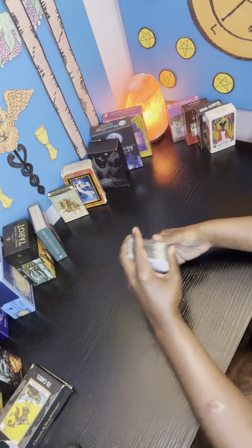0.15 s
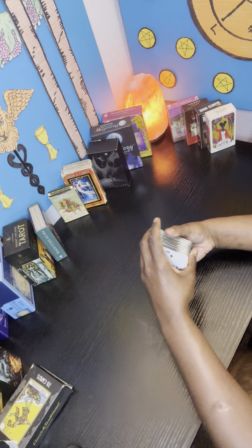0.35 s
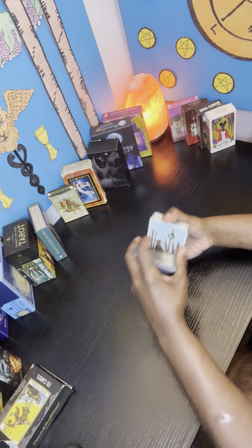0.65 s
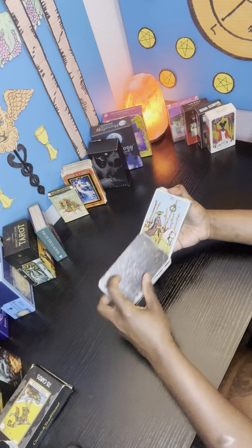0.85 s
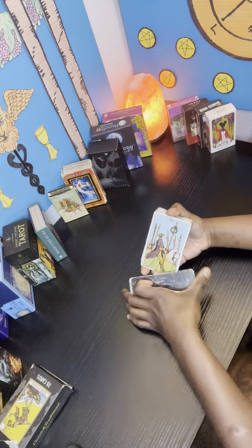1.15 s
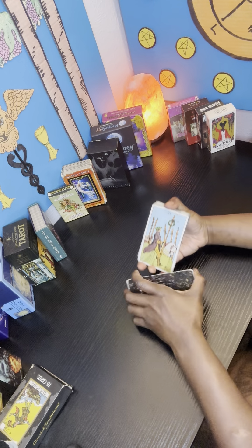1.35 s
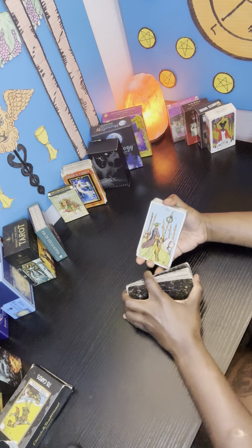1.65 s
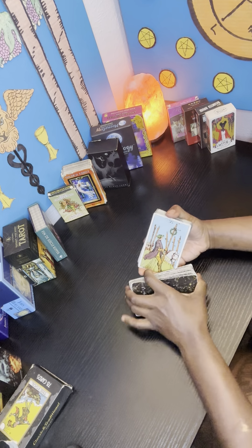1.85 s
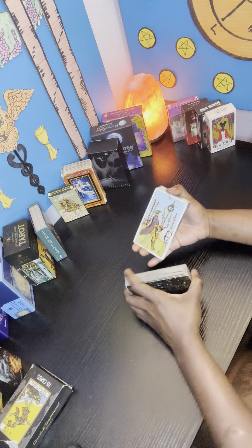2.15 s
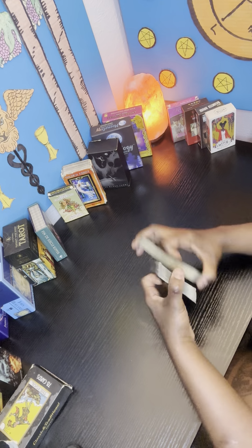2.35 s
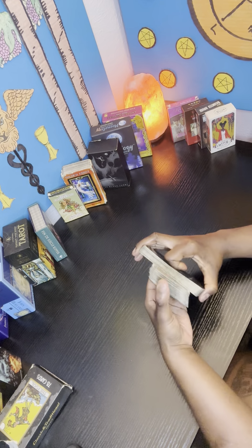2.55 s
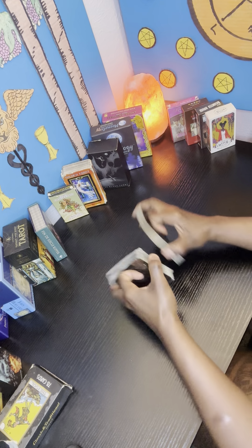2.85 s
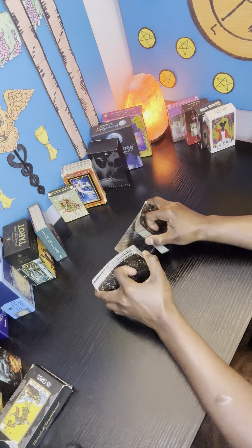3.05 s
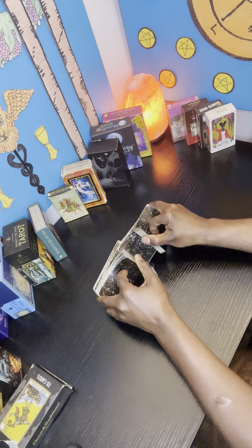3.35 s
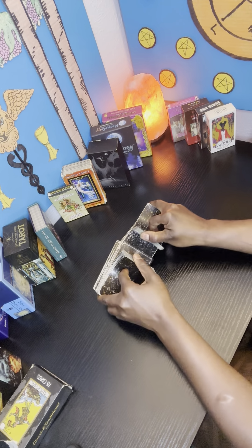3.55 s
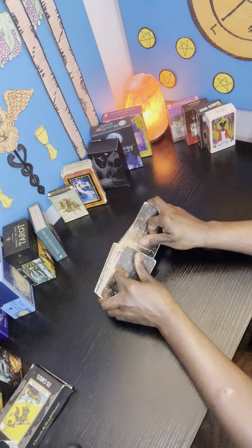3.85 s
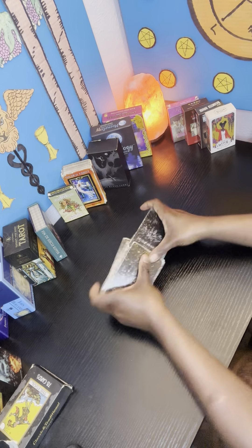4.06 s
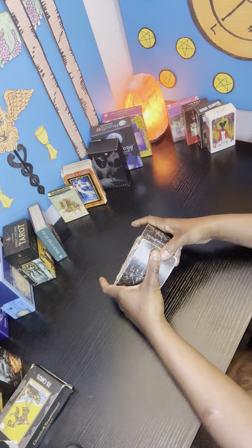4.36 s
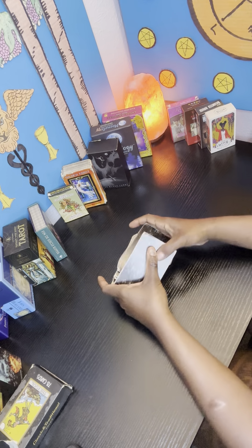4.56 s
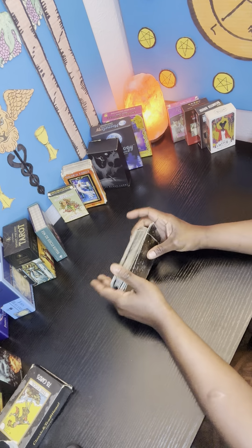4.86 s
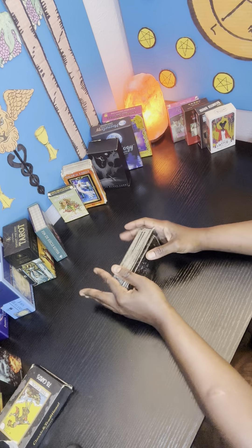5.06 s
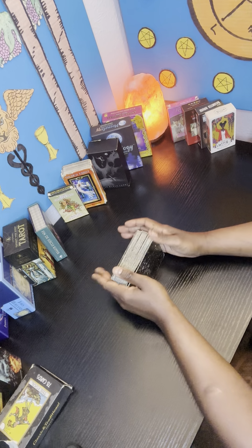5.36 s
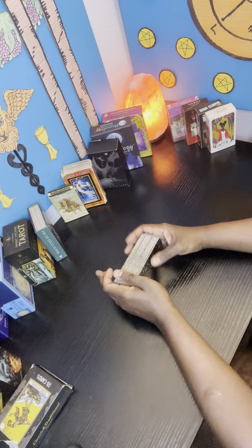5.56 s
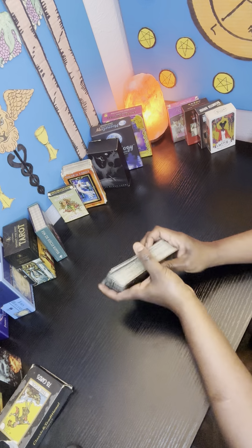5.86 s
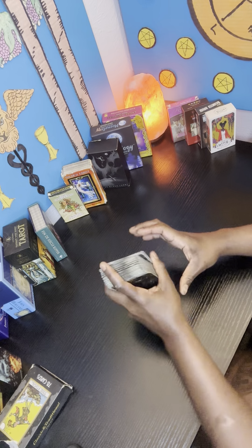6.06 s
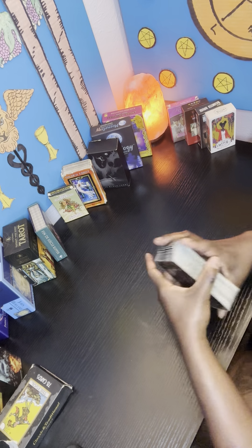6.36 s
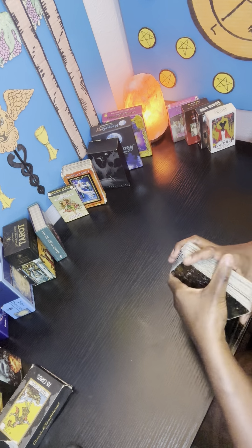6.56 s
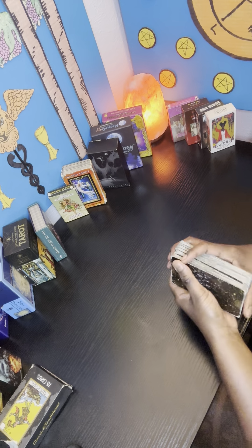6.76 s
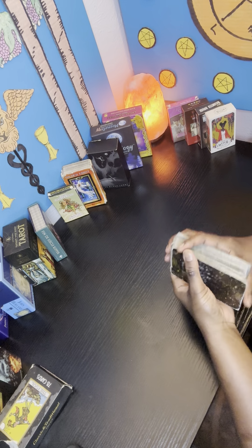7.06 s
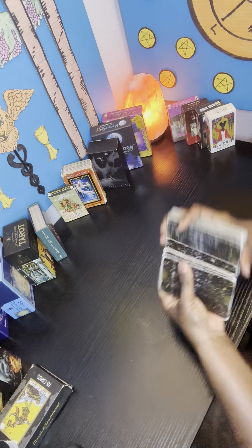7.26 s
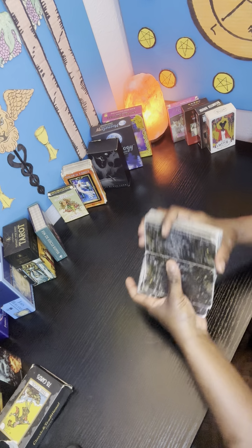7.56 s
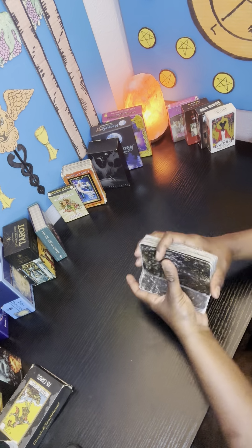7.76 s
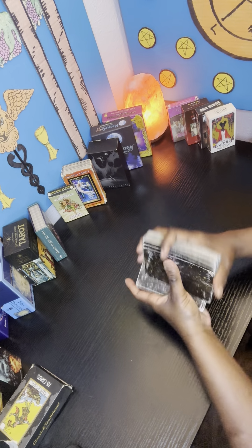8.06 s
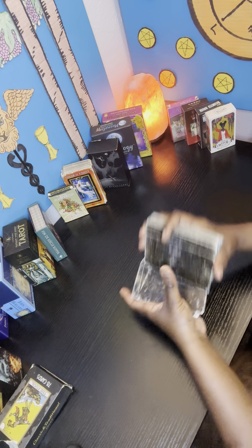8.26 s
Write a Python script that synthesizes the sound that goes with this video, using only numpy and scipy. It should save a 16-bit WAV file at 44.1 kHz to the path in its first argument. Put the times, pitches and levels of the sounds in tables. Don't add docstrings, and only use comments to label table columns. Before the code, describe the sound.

A small quiet room, close stereo microphone, a faint steady low rumble. At 0.0 s a crisp papery slap, then weak rustling and light touches until a cluster of soft, duller taps at about 1.4-1.7 s. A hard bright double snap hits at 2.03 s, followed by near quiet. From 2.7 to 3.05 s the bent pack gives tiny dry creaks, then a light tap. The riffle runs from 3.2 to 3.8 s: a dense, uneven, loud crackle of snapping cards with papery friction. Soft sliding follows, then from 4.25 to 4.65 s ragged scraping slaps as the halves are pushed together. Squaring taps come at 4.8-5.6 s, strongest near 4.9 and 5.1 s, then fade. A dull hollow table thump sounds at 6.15 s. After a lull, a low slap at 7.3 s leads into light intermittent brushes and slides to about 8.4 s.

```python
import sys
import numpy as np
from scipy import signal
from scipy.fft import rfft, irfft, next_fast_len
from scipy.io import wavfile
from scipy.ndimage import uniform_filter1d

SR = 44100
rng = np.random.default_rng(int(sys.argv[2]) if len(sys.argv) > 2 else 0)


def master_out(mix):
    frames = np.transpose(np.atleast_2d(mix))
    ceiling = np.clip(frames, -1, 1)
    pcm = np.round(ceiling * 32767).astype(np.int16)
    wavfile.write(sys.argv[1], SR, pcm)


def volts_from_decibels(level):
    exponent = np.asarray(level, float) / 20
    return 10 ** exponent


N = 370440


def rms_one(x):
    return x / np.sqrt(np.mean(x ** 2) + 1e-20)


def peak_one(x):
    return x / (np.max(np.abs(x)) + 1e-20)


def butter(x, order, hz, kind):
    return signal.sosfilt(signal.butter(order, hz, kind, fs=SR, output="sos"), x)


def at_hz(points, hz):
    points = np.array(points)
    log_hz = np.log(np.maximum(points[:, 0], 1))
    return np.interp(np.log(np.maximum(hz, 1)), log_hz, points[:, 1])


def coloured(x, spectrum):
    hz = np.fft.rfftfreq(x.shape[-1], 1 / SR)
    return irfft(rfft(x) * volts_from_decibels(at_hz(spectrum, hz)), x.shape[-1])


def drift(rate):
    r = np.exp(-2 * np.pi * rate / SR)
    wander = signal.lfilter([1], [1, -2 * r, r * r], rng.standard_normal(N + SR))
    return rms_one(wander[SR:])


def ring(clicks, modes):
    out = 0
    for hz, level_db, t60 in modes:
        r = volts_from_decibels(-60 / (t60 * SR))
        w = 2 * np.pi * hz / SR
        strike = [0, volts_from_decibels(level_db) * np.sin(w)]
        out = out + signal.lfilter(strike, [1, -2 * r * np.cos(w), r * r], clicks + 1e-18)
    return out


def add(track, s, sound):
    at = max(round(s * SR), 0)
    track[at:at + len(sound)] += sound[:len(track) - at]


def snaps(events, t60, rise_s, ragged_db, crack_db, hiss_db, quick, broad_db=-2.5):
    out = np.zeros(N)
    t = np.arange(SR // 5) / SR
    rise = 1 - np.exp(-(t / rise_s) ** 2)
    fall = volts_from_decibels(-60 * t / t60)
    noises = rng.standard_normal((len(events), 2, len(t)))
    for (s, peak_db, hz, thump_db, mid_db, top_db), (air, grit) in zip(events, noises):
        uneven = rms_one(uniform_filter1d(grit, size=60))
        puff = air * rise * fall * volts_from_decibels(ragged_db * uneven)
        body = butter(puff, 3, min(3.2 * hz, 3100), "low")
        pitched = butter(body, 1, [hz / 1.3, hz * 1.34], "band")
        broad = butter(body, 1, 400, "high")
        slap = peak_one(peak_one(pitched) + volts_from_decibels(broad_db) * peak_one(broad))
        flick = air * rise * fall ** (1 + quick) + .2 * puff
        crack = volts_from_decibels(mid_db + crack_db) * peak_one(butter(flick, 2, [2800, 5200], "band"))
        softened = signal.lfilter([.6], [1, -.4], flick)
        hiss = volts_from_decibels(top_db + hiss_db) * peak_one(butter(softened, 2, [4800, 15500], "band"))
        add(out, s, volts_from_decibels(peak_db) * (slap + crack + hiss))
    return out


def with_edges(events, edges):
    return [(*row, crack_db - row[1], hiss_db - row[1]) for row, (crack_db, hiss_db) in zip(events, edges)]


# frequency in Hz, density in dB per Hz.
RUMBLE = [(20, -35.5), (31, -21.5), (42, -3), (70, 2.5), (110, -12), (145, -4.5), (200, -18), (300, -28),
          (420, -33), (600, -52), (900, -71)]


def room_rumble():
    level_db = -52
    return volts_from_decibels(level_db) * rms_one(coloured(rng.standard_normal(N), RUMBLE))


# start in seconds, slap peak in dB, slap pitch in Hz,
# table thump in dB against the slap.
CUTS = [(0.001, -8.5, 2000, -11), (0.248, -49.5, 595, -8.5), (1.166, -34, 1620, -3.5),
        (1.385, -43.5, 1620, -7.5), (1.475, -26.5, 890, -15), (1.5, -22.5, 505, -16), (1.512, -21, 654, -6),
        (1.665, -29, 1320, -4.5), (2.034, -4, 2090, -20.5), (2.038, -8.5, 1270, -20),
        (2.047, -15.5, 1900, -6), (3.08, -25.5, 805, -7), (4.031, -38, 1310, -7), (4.093, -46, 600, 19),
        (4.831, -17.5, 594, -2), (4.889, -7.5, 1430, -21.5), (4.9, -16.5, 1670, -1.5),
        (4.992, -22, 1380, -18), (5.057, -23.5, 1310, -21), (5.082, -11.5, 2060, -16.5),
        (5.156, -21, 1940, -13), (5.222, -31, 1590, -12), (5.304, -33, 1260, -8), (5.4, -30.5, 2200, -6),
        (5.42, -20.5, 2000, -13.5), (5.432, -28, 1360, -11), (5.534, -24.5, 1370, -18),
        (5.603, -36, 1980, -7.5), (6.154, -30, 590, -4), (6.159, -23, 602, 16), (6.171, -25.5, 544, 5.5),
        (6.525, -51, 2010, 3.5), (6.616, -48, 1840, -22), (7.303, -18, 638, -9.5), (7.313, -31.5, 700, -2),
        (7.88, -25.5, 930, -10.5)]
# crack peak in dB, edge hiss peak in dB.
CUT_EDGES = [(-16, -26), (-62, -62), (-44, -48), (-49, -44), (-41, -50), (-36, -44), (-41, -49), (-51, -54),
             (-9, -20), (-9, -21), (-17, -29), (-32, -44), (-51, -52), (-50, -51), (-37, -42), (-10, -16),
             (-13, -23), (-26, -32), (-26, -38), (-16, -22), (-32, -34), (-39, -42), (-46, -54), (-49, -60),
             (-31, -45), (-27, -37), (-39, -46), (-51, -49), (-46, -47), (-43, -46), (-46, -45), (-49, -58),
             (-57, -53), (-31, -27), (-37, -37), (-25, -16)]


def cuts():
    return snaps(with_edges(CUTS, CUT_EDGES), t60=.1, rise_s=.0011, ragged_db=2.5,
                 crack_db=1.5, hiss_db=-4, quick=.57)


# frequency in Hz, level in dB, 60 dB decay in seconds.
TABLE = [(146.8, -0.5, 0.14), (209.9, -7, 0.12), (275, -2, 0.057), (331.2, -4, 0.063), (467.3, -9, 0.091),
         (595, -10.5, 0.074), (855, -11.5, 0.065)]


def thumps(events, push_s, level_db):
    pushes = np.zeros(N)
    push = np.hanning(round(push_s * SR))
    for s, peak_db, hz, thump_db, *edges in events:
        add(pushes, s + .003, volts_from_decibels(peak_db + thump_db + level_db) * push / push.sum())
    return butter(ring(pushes, TABLE), 2, 90, "high")


# frequency in Hz, 60 dB decay in seconds.
ROOM_T60 = [(150, 0.3), (500, 0.29), (2000, 0.28), (5000, 0.19), (12000, 0.071)]
# frequency in Hz, level in dB.
ROOM_COLOUR = [(150, -4), (500, -4), (1400, -10), (1800, -2), (2100, -2.5), (2500, -5), (3800, -4),
               (4400, -4.5), (4900, -4.5), (7000, -13), (12000, -19)]


def room(x, level_db, gap_s):
    t = np.arange(SR // 2) / SR
    tails = 0
    edges = 90 * 2 ** np.arange(0, 7.6, .5)
    for low, high in zip(edges, edges[1:]):
        band = butter(rng.standard_normal((2, len(t))), 2, [low, high], "band")
        tails = tails + band * volts_from_decibels(-60 * t / at_hz(ROOM_T60, np.sqrt(low * high)))
    onset = np.clip(t / gap_s - 1, 0, 1)
    tails = coloured(tails, ROOM_COLOUR) * onset * volts_from_decibels(level_db)
    return signal.fftconvolve(x[None], tails, axes=1)[:, :N]


# time in seconds, rub in dB, hiss in dB.
SLIDE = [
    [(0.16, -45.5, -89), (0.212, -51.5, -59), (0.278, -70, -101), (0.372, -59, -102), (0.4, -66.5, -76),
     (0.49, -73.5, -75), (0.568, -58, -62), (0.654, -66.5, -76), (0.738, -60.5, -68), (0.784, -72, -75),
     (0.842, -55, -51.5), (1.004, -91, -80.5), (1.04, -62, -61), (1.104, -54.5, -64), (1.158, -66, -77),
     (1.166, -55, -61), (1.204, -56.5, -88), (1.324, -66, -87), (1.396, -62, -55), (1.45, -61, -79)],
    [(1.75, -71.5, -77.5), (1.846, -69, -73), (1.902, -84, -102), (1.92, -55, -81), (1.942, -80.5, -102),
     (1.97, -61.5, -102)],
    [(2.28, -62, -90.5), (2.298, -72, -71.5), (2.498, -76, -74), (2.526, -59, -60), (2.566, -86, -99),
     (2.74, -81.5, -79.5), (2.758, -65, -77), (2.78, -60.5, -102), (2.788, -64, -73), (2.848, -72, -84),
     (2.854, -72.5, -54), (2.958, -82.5, -99), (3.028, -79.5, -101), (3.05, -56, -67)],
    [(3.87, -50.5, -52), (3.948, -50.5, -65), (3.97, -54, -60), (4.02, -57, -66), (4.038, -51, -62),
     (4.084, -56, -63.5), (4.232, -46, -53), (4.24, -69, -48)],
    [(4.66, -64, -55), (4.694, -67.5, -80), (4.738, -53.5, -56), (4.748, -65, -64.5), (4.81, -58.5, -66)],
    [(5.6, -64, -65), (5.622, -49, -68), (5.638, -58, -72), (5.692, -55, -60), (5.756, -63, -68),
     (5.802, -58, -60), (5.828, -70, -72), (5.87, -58, -61), (5.97, -89.5, -74.5), (6.04, -85, -102),
     (6.14, -79.5, -80.5)],
    [(6.35, -81.5, -77.5), (6.4, -82.5, -102), (6.49, -80, -70.5), (6.51, -81, -102), (6.53, -55, -86),
     (6.55, -63.5, -73), (7.18, -71, -78), (7.27, -52.5, -58), (7.31, -36, -42.5), (7.33, -73, -61),
     (7.45, -84, -83), (7.47, -45, -46.5), (7.52, -77, -64), (7.6, -37, -55), (7.66, -62.5, -77),
     (7.75, -62.5, -102), (7.76, -54, -66), (7.81, -62, -74.5), (7.87, -38, -47), (7.88, -37, -30.5),
     (7.93, -76, -57.5), (8.01, -78, -80), (8.03, -67, -63), (8.09, -63, -58), (8.15, -37.5, -47),
     (8.27, -68, -101), (8.31, -60, -50), (8.31, -39, -60), (8.34, -57, -63), (8.4, -46, -52)],
]
# time in seconds, rub in dB, hiss in dB.
SLIDE_UNDER = [
    [(3.2, -56.5, -120), (3.258, -23.5, -95), (3.382, -29.5, -34), (3.442, -28, -47), (3.632, -26, -42.5),
     (3.696, -26, -42), (3.818, -32, -62), (3.85, -35, -60)],
    [(4.26, -27.5, -47), (4.336, -44, -46), (4.43, -34, -48.5), (4.488, -36, -47), (4.604, -39.5, -45),
     (4.64, -49, -58)],
    [(4.9, -40, -78), (5.0, -52, -97), (5.048, -46, -82), (5.234, -59, -91), (5.406, -69, -110.5),
     (5.468, -52, -101), (5.58, -53.5, -86)],
]
# frequency in Hz, density in dB per Hz.
RUB = [(300, -18), (600, -11), (1300, -9), (1700, -5), (2000, 1), (2500, -6), (3300, -2), (4000, -7),
       (7000, -20)]
# frequency in Hz, density in dB per Hz.
HISS = [(3000, -12), (5000, 1), (7500, 1.5), (10000, -1), (12000, -2), (16000, -3)]


def sliding(grain_db, lumpy_db):
    s, rub_db, hiss_db = np.transpose(sorted(sum(SLIDE + SLIDE_UNDER, [])))
    t = np.arange(N) / SR
    grains = rng.standard_normal(N) * volts_from_decibels(grain_db * drift(130) + lumpy_db * drift(29))
    rub = volts_from_decibels(np.interp(t, s, rub_db) - 4.5) * rms_one(coloured(grains, RUB))
    hiss = volts_from_decibels(np.interp(t, s, hiss_db) + 2.5) * rms_one(coloured(grains, HISS))
    return rub + hiss


# start in seconds, slap peak in dB, pitch in Hz, then table thump, crack
# and edge hiss, all in dB against the slap.
BRUSHES = [(0.549, -57, 1730, -26, -17, -8), (0.725, -50, 1880, -5, -15, -5),
           (0.835, -42, 1960, -26, -16, -4), (0.859, -45.5, 708, -6.5, -14, -12),
           (1.035, -54.5, 1270, 9, 3, 3.5), (1.083, -45.5, 1950, 2, 5, -18),
           (1.918, -54, 1360, -20, 3, -21), (2.299, -59, 2110, -10, -7.5, 0),
           (2.399, -51, 1345, -0.5, -15.5, -24), (2.521, -59, 2710, -22, -4.5, -15),
           (2.855, -69, 1830, -12, -5, -22), (4.069, -49.5, 573, 12.5, -18.5, -24),
           (4.199, -38, 1960, -7, -12, -19), (5.696, -47, 654, 6.5, -15, -16),
           (5.727, -48, 2410, 5, -8, -22), (5.865, -55.5, 1990, -3, -7, -19),
           (7.456, -35.5, 1240, -12.5, -23, -15), (7.535, -39.5, 707, -15, -27, -14),
           (7.591, -33.5, 713, -8, 1, -17), (7.758, -42, 1960, -2, -16.5, -7),
           (7.847, -41, 2490, -11, -6, -17), (7.861, -23.5, 2600, -14.5, 3.5, -26),
           (8.02, -35, 2680, -14, 6, -8), (8.066, -43, 1590, -10, 5, -12), (8.118, -40, 2600, -17, -9, -19),
           (8.141, -23.5, 2650, -10.5, 2.5, -27), (8.293, -39, 1190, -11, 1, -9),
           (8.312, -31.5, 1340, -7.5, -12, -24), (8.383, -38.5, 2710, -26, -15, -11)]


def brushes():
    return snaps(BRUSHES, t60=.11, rise_s=.005, ragged_db=4, crack_db=-8, hiss_db=5, quick=.23)


# start in seconds, peak in dB.
CREAK = [(2.7303, -72), (2.7578, -49), (2.7898, -47.5), (2.8072, -50), (2.8261, -53.5), (2.8406, -56.5),
         (2.8556, -46.5), (2.87, -46), (2.9213, -57), (2.9429, -61), (2.9613, -44), (2.9836, -59),
         (3.0053, -51), (3.0221, -57), (3.0366, -50.5), (3.0484, -45)]
# frequency in Hz, level in dB, 60 dB decay in seconds.
CREAK_MODES = [(1450, -4, .016), (1750, -3, .014), (2000, 0, .022), (2400, -2, .012), (3100, -9, .01)]


def creak():
    slips = np.zeros(N)
    fade_db = np.arange(900) / 45
    for (s, peak_db), scratch in zip(CREAK, rng.standard_normal((len(CREAK), 900))):
        add(slips, s, volts_from_decibels(peak_db - 19 - fade_db) * scratch)
    return butter(ring(slips, CREAK_MODES), 3, [1200, 3200], "band")


# start in seconds, slap peak in dB, slap pitch in Hz,
# table thump in dB against the slap.
RIFFLE = [(3.209, -18, 2160, -14.5), (3.219, -23, 501, -11), (3.237, -17.5, 571, -8),
          (3.264, -9.5, 473.5, -23), (3.304, -21.5, 1640, -15.5), (3.339, -12.5, 2150, -21.5),
          (3.366, -8, 1920, -23.5), (3.399, -11.5, 1430, -10), (3.447, -6, 1580, -21),
          (3.458, -17.5, 1670, -15.5), (3.472, -12, 664, -5.5), (3.523, -11.5, 1480, -19.5),
          (3.534, -12.5, 2190, -14), (3.574, -26, 2120, -3), (3.604, -14, 501, -16),
          (3.615, -2.5, 2120, -19.5), (3.645, -12, 837, -9.5), (3.696, 0.5, 2490, -35),
          (3.716, -7.5, 2710, -15.5), (3.748, -6, 1690, -14.5), (3.753, -9.5, 1630, -10.5),
          (3.785, -12, 1710, -18.5), (3.791, -16.5, 1930, -14.5), (3.816, -16.5, 1630, -12.5)]
# crack peak in dB, edge hiss peak in dB.
RIFFLE_EDGES = [(-24, -30), (-29, -27), (-21, -18), (-8, -2), (-16, -24), (-7, -2), (-13, -15), (-13, -9),
                (-11, -6), (-19, -15), (-15, -19), (-5, -4), (-19, -14), (-23, -18), (-22, -22), (-8, -11),
                (-12, -8), (-5, -6), (-4, -7), (-16, -22), (-10, -8), (-15, -13), (-9, -6), (-19, -19)]


def riffle():
    return snaps(with_edges(RIFFLE, RIFFLE_EDGES), t60=.055, rise_s=.0005, ragged_db=2,
                 crack_db=1.5, hiss_db=1, quick=1.5)


# start in seconds, slap peak in dB, pitch in Hz, then table thump,
# crack and edge hiss, all in dB against the slap.
PUSHES = [(4.26, -30, 2200, 0, -8, -17), (4.269, -15.5, 2000, -23, -0.5, -3.5),
          (4.277, -14, 840, -32.5, -30, -11), (4.297, -26, 1260, -12, -18, -15),
          (4.315, -26, 1970, -9, -13, -13), (4.34, -36, 864, -7, 4.5, -6), (4.361, -21, 476, -18, -16, -33),
          (4.38, -20.5, 1270, -14, -3, -5), (4.415, -18.5, 713, -30.5, -10, -34),
          (4.432, -30, 2190, -18, -3, -22), (4.45, -15.5, 985, -22, -12.5, -41),
          (4.485, -20, 1000, -13.5, -5, -19), (4.515, -24, 600, -18.5, -23, -26.5),
          (4.54, -12.5, 2660, -45, -11.5, -24), (4.554, -25, 2700, -10.5, 7, -7.5),
          (4.6, -24, 1900, -33.5, -14, -11), (4.634, -37, 1820, -10, -1, -48)]


def pushes_together():
    return snaps(PUSHES, t60=.07, rise_s=.0012, ragged_db=7.5, crack_db=3.5, hiss_db=8.5, quick=.75)


# frequency in Hz, side against mid in dB.
WIDTH = [(150, -30), (350, -22), (700, -14), (1400, -8), (3000, -8), (4500, -14), (6500, -34), (9500, -34),
         (12000, -22)]


def side_signal(direct, wet_side, rumble):
    scatter = rng.standard_normal(900) * volts_from_decibels(-np.arange(900) / 30)
    near_side = signal.fftconvolve(direct, scatter / np.linalg.norm(scatter))[:N]
    return coloured(near_side + volts_from_decibels(5) * wet_side + rumble[::-1], WIDTH)


def scene():
    rumble = room_rumble()
    knocks = cuts() + brushes() + creak() + riffle() + pushes_together()
    knocks += thumps(CUTS + RIFFLE + PUSHES + BRUSHES, push_s=.0022, level_db=1)
    rubbing = sliding(grain_db=2.5, lumpy_db=1.5)
    wet_mid, wet_side = room(knocks, level_db=-32, gap_s=.0034)
    side = side_signal(knocks + rubbing, wet_side, rumble)
    return knocks + rubbing + wet_mid + rumble + side * [[1], [-1]]


def low_pass(x):
    return signal.sosfilt(signal.butter(12, 16510, fs=SR, output="sos"), x)


def record(dry):
    ports_hz, cutoff_hz = 3850, 15900
    size = next_fast_len(N + 2048)
    turn = -np.pi / 2 * np.maximum(np.fft.rfftfreq(size, 1 / SR) / ports_hz - 1, 0)
    ports = irfft(rfft(dry, size) * np.exp(1j * np.outer([1, -1], turn)), size)[:, :N]
    rounded = 1.3 * np.tanh(ports / 1.3)
    top_cut = signal.cheby2(10, 50, cutoff_hz * 1.04, fs=SR, output="sos")
    return low_pass(signal.sosfilt(top_cut, rounded))


dry = scene()
out = record(dry)
master_out(out)
```